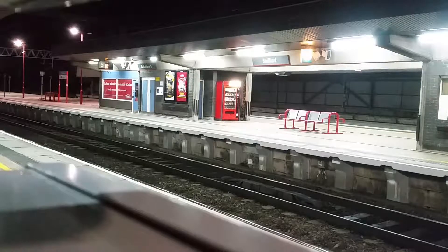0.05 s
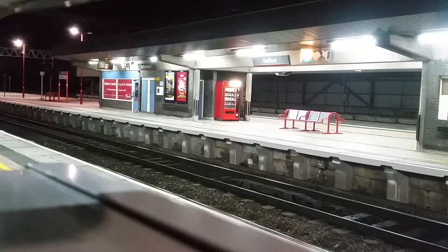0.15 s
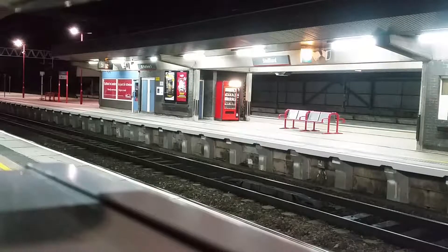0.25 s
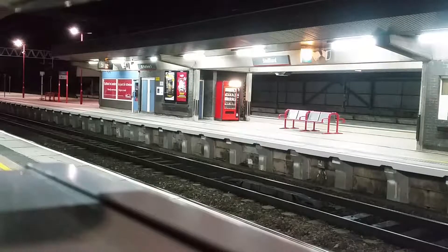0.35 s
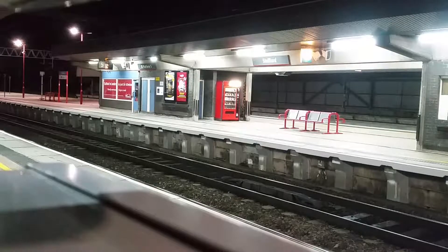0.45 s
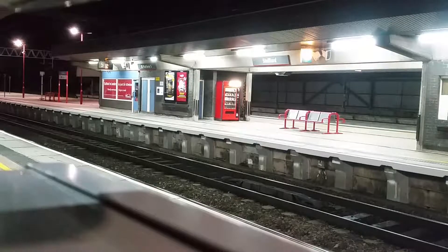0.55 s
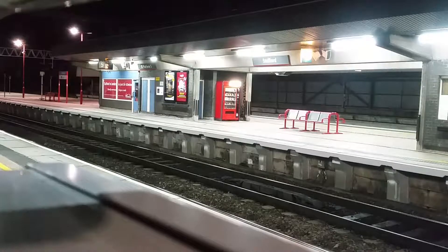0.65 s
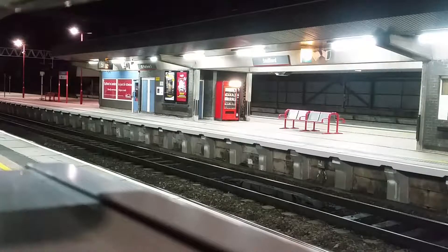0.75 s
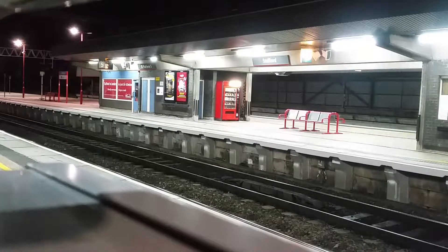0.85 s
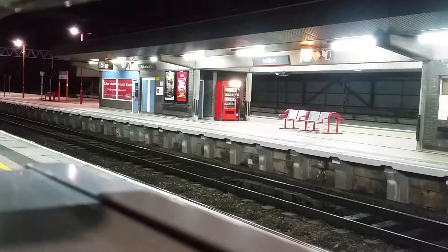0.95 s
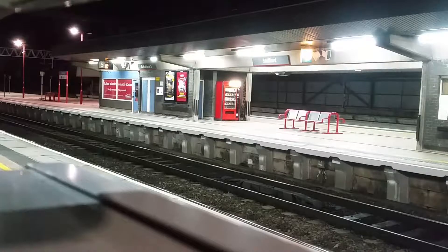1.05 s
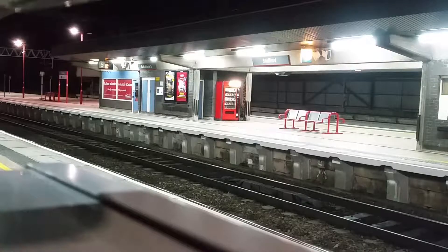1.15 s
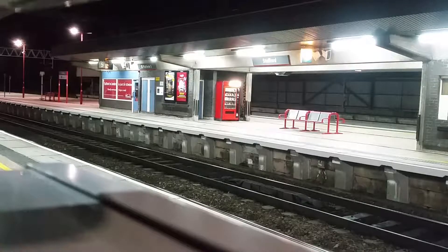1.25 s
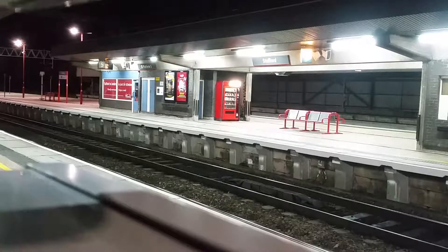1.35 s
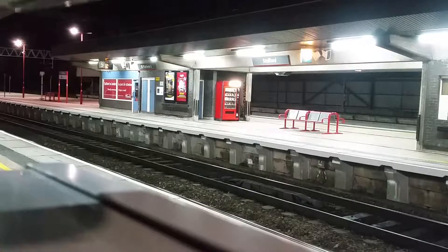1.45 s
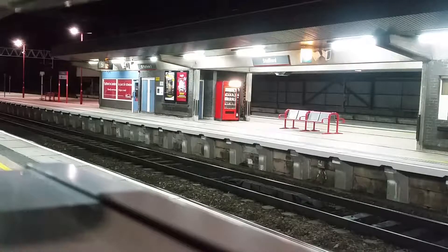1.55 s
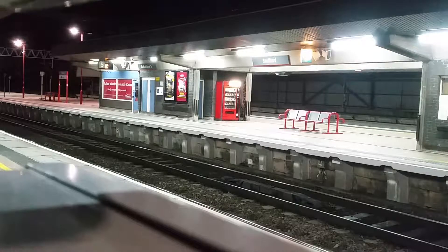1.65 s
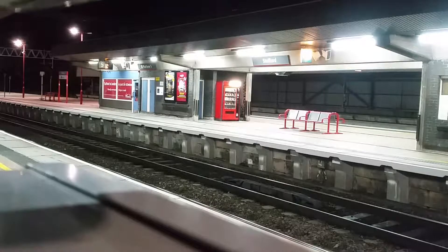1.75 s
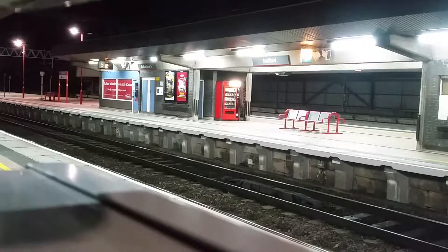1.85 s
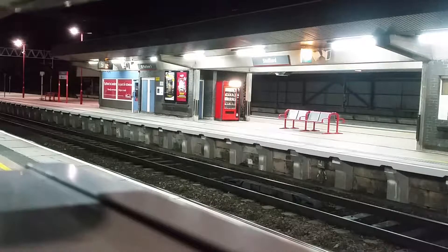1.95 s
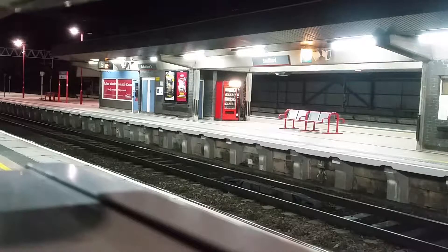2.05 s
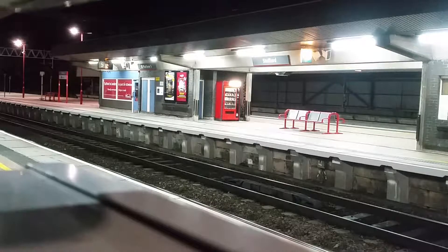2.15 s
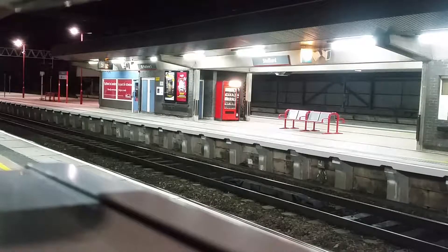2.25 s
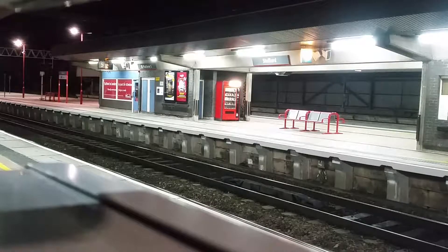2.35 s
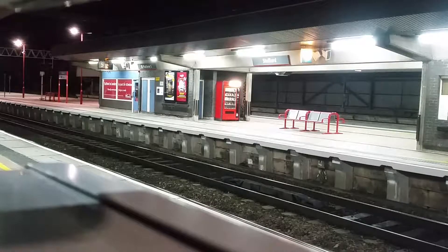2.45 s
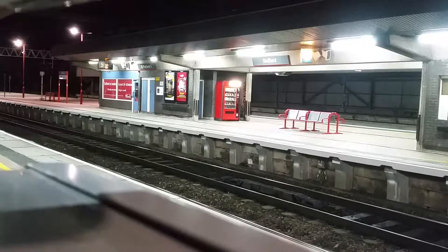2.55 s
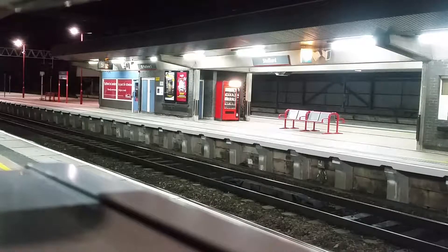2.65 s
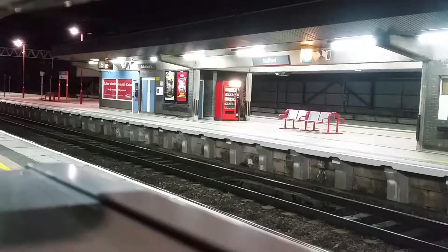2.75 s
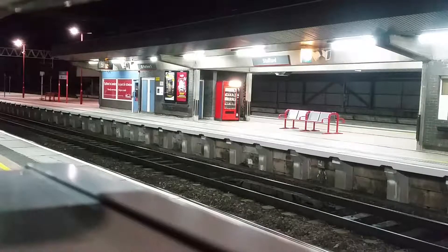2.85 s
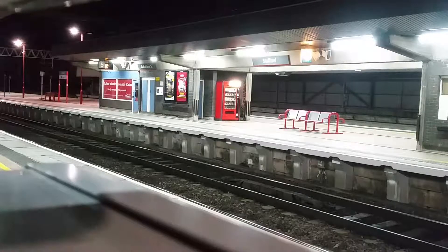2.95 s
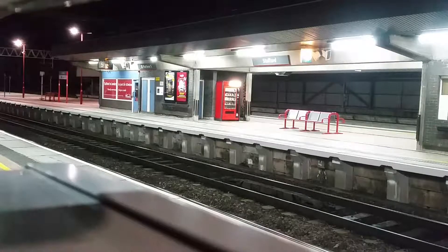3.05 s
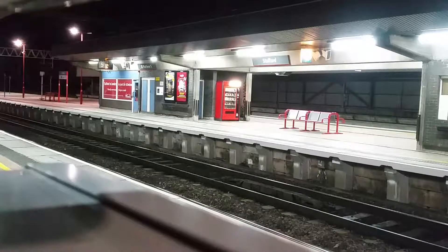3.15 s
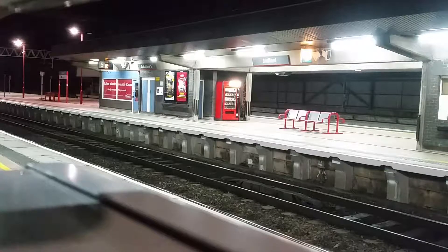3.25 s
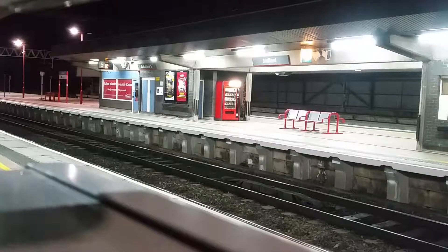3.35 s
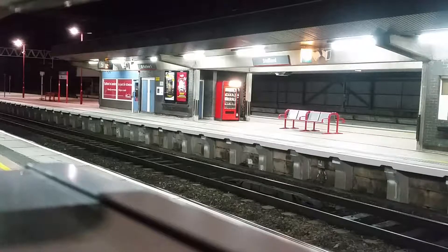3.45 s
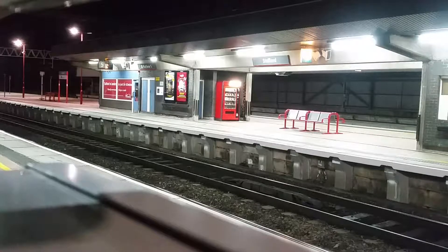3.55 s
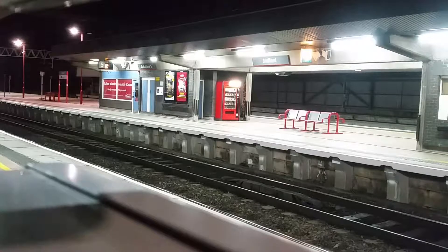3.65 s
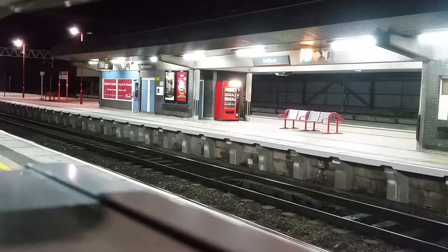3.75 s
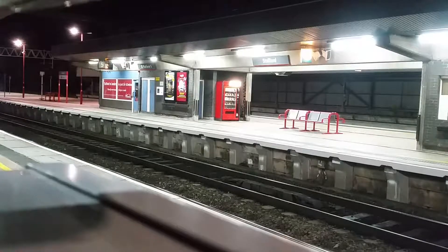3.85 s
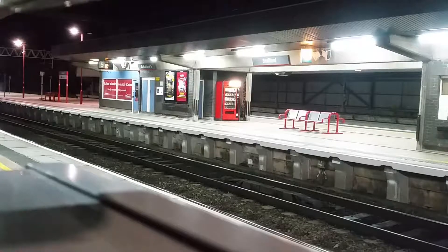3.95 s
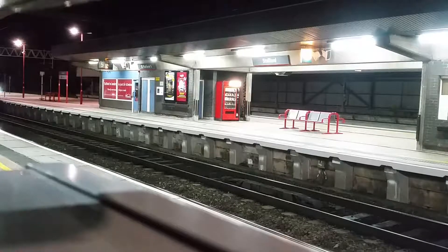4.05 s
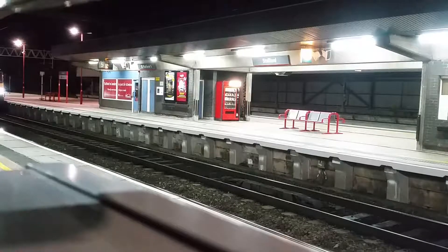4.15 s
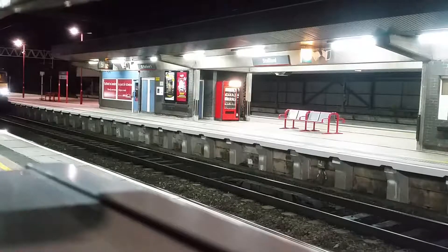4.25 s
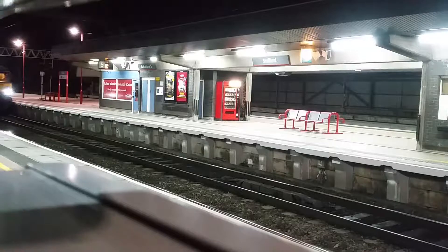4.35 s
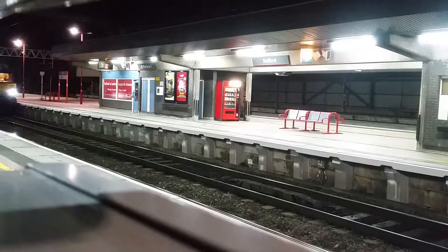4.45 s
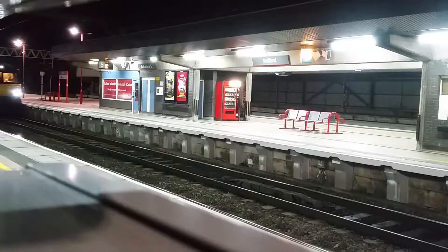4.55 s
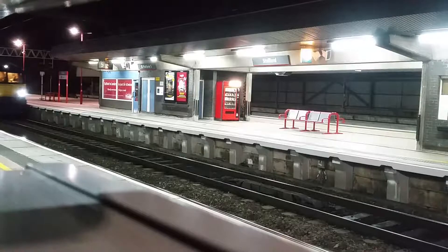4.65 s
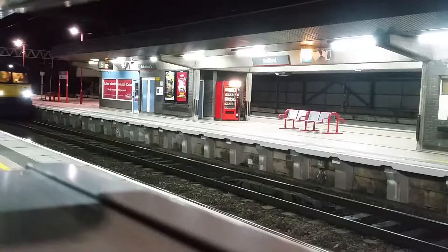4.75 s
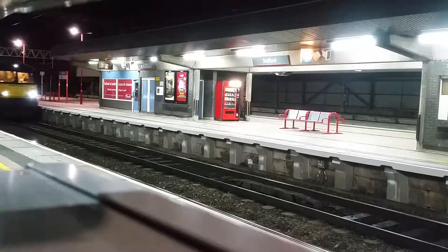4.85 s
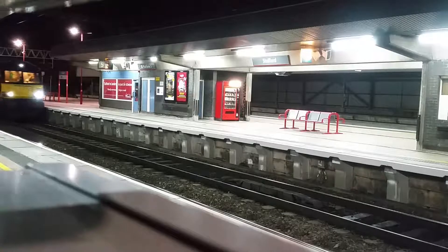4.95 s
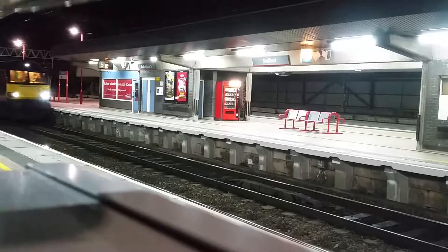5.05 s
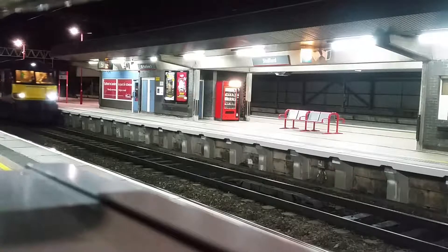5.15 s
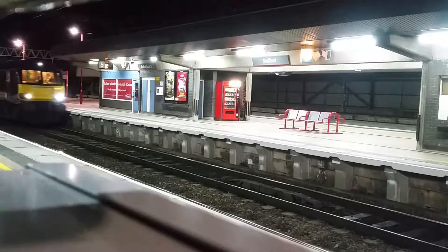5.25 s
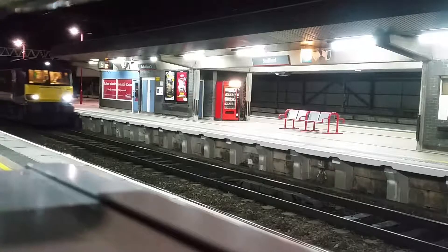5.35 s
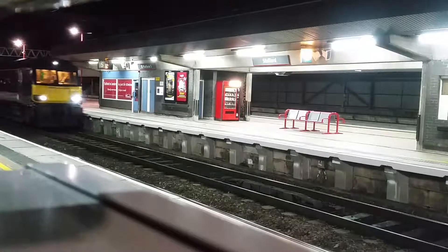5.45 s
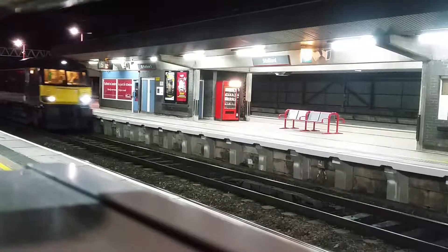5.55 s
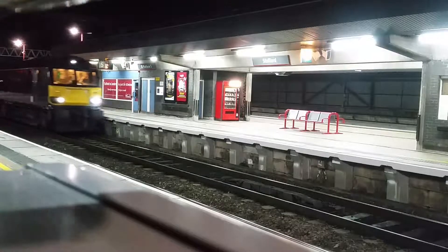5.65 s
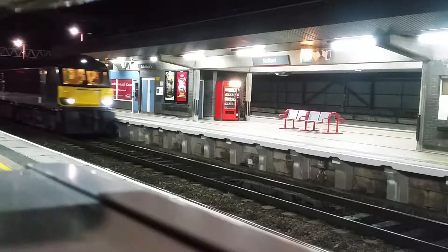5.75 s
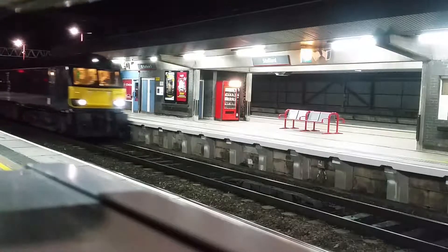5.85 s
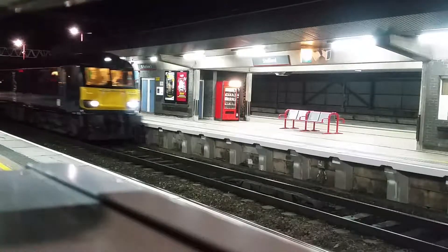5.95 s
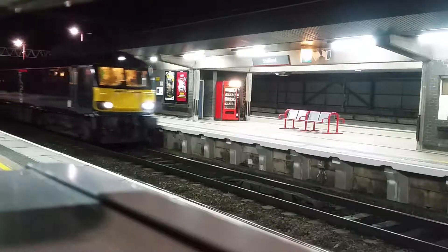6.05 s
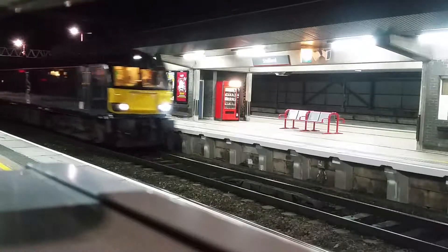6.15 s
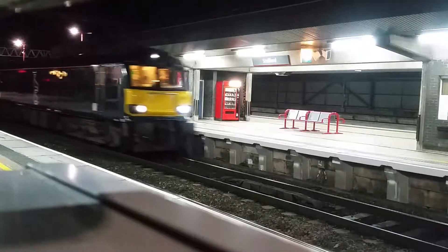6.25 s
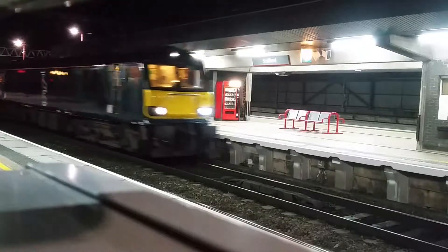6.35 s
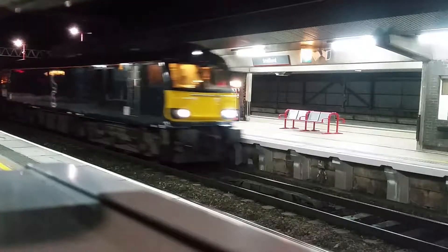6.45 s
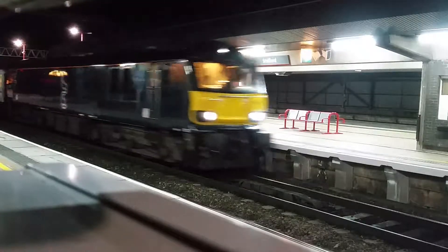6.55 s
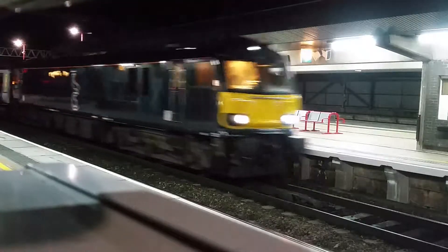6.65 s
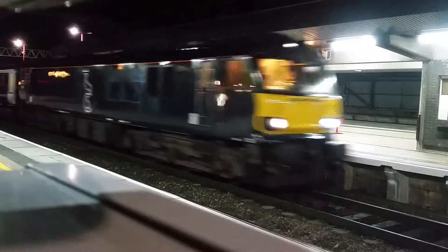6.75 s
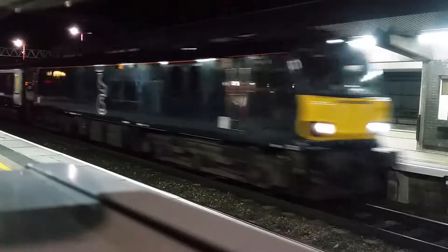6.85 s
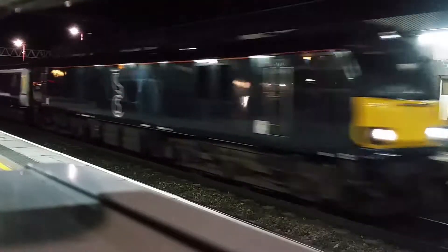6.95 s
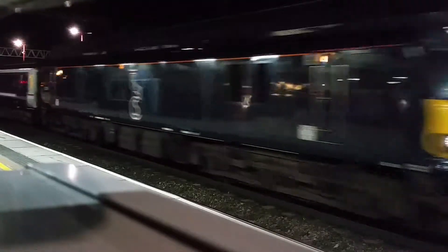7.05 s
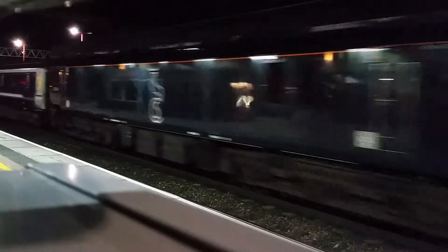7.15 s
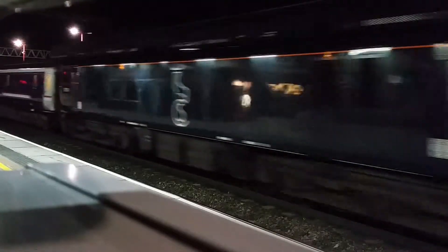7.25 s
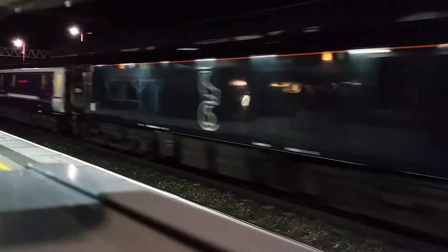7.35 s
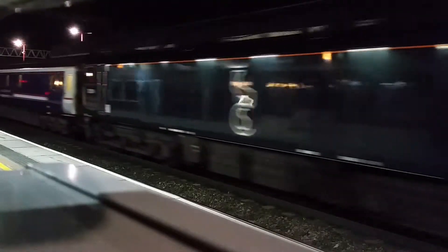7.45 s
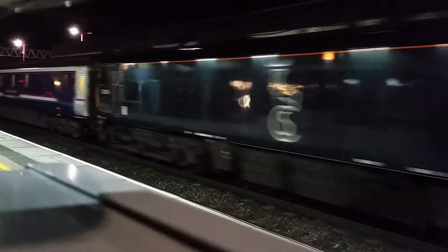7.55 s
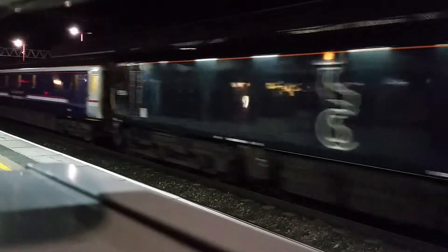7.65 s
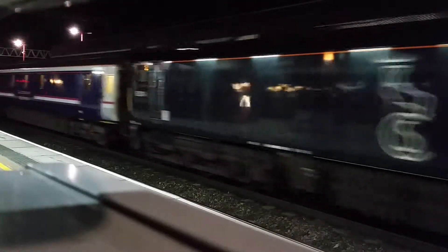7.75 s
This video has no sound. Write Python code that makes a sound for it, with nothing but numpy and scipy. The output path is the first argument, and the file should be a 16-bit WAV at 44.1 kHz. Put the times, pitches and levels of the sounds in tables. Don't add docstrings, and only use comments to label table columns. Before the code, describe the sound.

A heavy electric train approaches an empty station platform, its faint singing rail rush growing into a broad, hissing roar, left to right.

```python
import sys
import numpy as np
from scipy import signal
from scipy.fft import rfft, irfft
from scipy.io import wavfile
from scipy.ndimage import uniform_filter1d

SR = 44100
rng = np.random.default_rng(int(sys.argv[2]) if len(sys.argv) > 2 else 0)


def output_pcm(signal):
    pcm = np.clip(np.atleast_2d(signal).T, -1, 1) * 32767
    wavfile.write(sys.argv[1], SR, np.round(pcm).astype(np.int16))


def how_loud(loudness_db):
    steps = np.asarray(loudness_db, float) / 20
    return 10 ** steps


N = 343980
SIZE, HOP = 4096, 1024

# (frequency [Hz], left minus right [dB], likeness far [0-1], likeness near [0-1],
# left leads far [rad], left leads near [rad])
PORT_PAIR = [(60, 0.5, 0.985, 0.985, 0, 0), (160, 1, .99, .98, 0.1, -0.05),
             (296, 1, 0.94, 0.99, -0.1, 0.25), (500, 3.5, 0.9, 0.91, 0.8, 0.2),
             (675, 8.5, 0.66, 0.74, -0.2, 0.8), (770, 10, 0.27, 0.22, 1, 1.3),
             (1000, 7, .2, 0.21, -1.2, -2.1), (1500, 3, 0.3, 0.43, -4, -2.5),
             (2100, 2, 0.21, 0.14, -1.5, -0.2), (2500, -1.5, 0.28, .15, 1.3, -4.5),
             (2980, 0, 0.34, 0.25, 4.5, 3.2), (5000, -7.5, .45, .2, 5.5, 5.5), (6700, 1, .35, .2, 8, 7),
             (8000, -5, .2, .15, 8.5, 8.5), (11500, -7.5, .1, .1, 11.5, 16), (15000, 3, .05, .05, 17, 13.5)]


def evened(x):
    return x / np.sqrt(np.mean(x ** 2) + 1e-20)


def columns(rows, at, warp=np.asarray):
    first, *rest = np.transpose(rows)
    return [np.interp(warp(at), warp(first), c) for c in rest]


def drift(shape, across, along):
    noise = rng.standard_normal(shape[::-1]).T
    return evened(uniform_filter1d(uniform_filter1d(noise, across, 0), along, 1))


def swell(t, s, db, lasting):
    return db * np.exp(-.5 * ((t - s) / lasting) ** 2)


def smooth_step(x, at, length):
    return (1 + np.tanh((x - at) / (2 * length))) / 2


def resonance(hz, centre, width):
    return 1 / (1 + (2 * (hz - centre) / width) ** 2) ** 2


def port_gains(tilt_db):
    return how_loud([[tilt_db / 2], [-tilt_db / 2]])


def roar(t, size=5):
    # (time [s], level [dB])
    roar_rows = [(0, -36.5), (.6, -35.5), (1.2, -33.5), (2, -29.5), (2.8, -28.5), (3.3, -26.5), (4, -21),
                 (4.35, -21), (5.02, -16), (5.3, -16), (5.8, -16), (6.2, -13), (6.8, -13), (7.3, -12),
                 (7.65, -12), (7.8, -12)]
    return uniform_filter1d(columns(roar_rows, t)[0], size)


def follow(t, full_db, share, step_db, step_s, length):
    alongside_db = -13
    return full_db + share * (roar(t) - alongside_db) + step_db * smooth_step(t, step_s, length)


def vent_gust(t):
    return swell(t, s=7.39, db=3, lasting=.04)


def rolling_levels(t):
    ground_db = follow(t, full_db=-37, share=.86, step_db=-.6, step_s=7, length=.2)
    ground_db += swell(t, 5.75, 4.5, .27) + swell(t, 6.65, -5.5, .2)
    station_db = -47
    ground_db = 10 * np.log10(how_loud(2 * ground_db) + how_loud(2 * station_db))
    ring_db = follow(t, full_db=-26.5, share=.84, step_db=-3.8, step_s=6.7, length=.25)
    contact_db = follow(t, full_db=-41.3, share=.89, step_db=-4, step_s=4.9, length=.35)
    contact_db += swell(t, s=7.55, db=2.3, lasting=.35) + vent_gust(t)
    return np.array([ground_db, roar(t), ring_db, contact_db])


def singing(hz, t):
    # (start frequency [Hz], end frequency [Hz], width [Hz], level over the rush [dB],
    # clearest time [s], duration [s])
    modes = [(100, 100, 12, 3, 2, 2.5), (175, 178, 14, 5, 4.2, 2.5), (247, 250, 12, 5, 1.5, 3),
             (358, 366, 16, 4, 1.8, 2.5), (372, 376, 14, 5, 6.5, 1), (490, 485, 16, 5, 5.5, 2.5),
             (627, 630, 14, 4, 1.5, 2), (698, 716, 14, 6, 2.2, 2.2), (765, 770, 34, 5, 4.2, 1.8),
             (1065, 1065, 20, 5, 2, .5), (1400, 1480, 40, 4.5, 3.2, 2), (1440, 1485, 34, 6, 6.2, 1.3),
             (1765, 1810, 26, 5, 2, 2), (2010, 2030, 26, 5, 2, .7), (2020, 2040, 50, 3, 5.8, 1.5),
             (2600, 2600, 50, 3, 6.5, 1.5), (685, 685, 16, 5, 7.4, .5), (440, 445, 20, 5, 6.7, .6),
             (540, 535, 14, 3, 4.5, 1.2), (330, 335, 14, 4, 5.3, .6)]
    # (start frequency [Hz], end frequency [Hz], width [Hz], level over the rush [dB],
    # clearest time [s], duration [s])
    bogies = [
        (480, 560, 450, 1.9, 6.96, 0.35),
        (190, 190, 81, 2.2, 7.4, 0.25),
        (380, 306, 130, 5.4, 7.6, 0.47),
        (175, 163, 45, 2, 5.5, 0.15),
    ]
    rows = [*modes, *bogies]
    wavers = drift((len(rows), len(t)), across=1, along=16)
    waver_db = 1.2
    lift = np.ones((len(hz), len(t)))
    for (hz0, hz1, width, over_db, s, lasting), waver in zip(rows, wavers):
        centre = hz0 + (hz1 - hz0) * t / t[-1]
        strength = how_loud(2 * (over_db + waver_db * waver)) * swell(t, s, 1, lasting)
        lift += strength * resonance(hz[:, None], centre, width)
    return lift


def flares(hz, t):
    # (frequency [Hz], width [Hz], level [dB], time [s],
    # duration [s])
    rises_and_lulls = [(300, 70, 3.5, 0.22, 0.42), (353, 18, 0, 1.2, .2), (719, 26, 8.5, 1.7, 0.38),
                       (842, 81, 7, 2.2, 0.32), (714, 32, 8, 3.4, 0.17), (741, 30, 10.5, 3.9, 0.18),
                       (510, 40, 7, 3.3, 0.12), (1460, 28, 3, 4.7, 0.28), (760, 90, 3, 5.07, 0.24),
                       (623, 29, -1, 9.7, .12), (890, 60, 7.5, 3.9, 0.14), (1460, 48, 0.5, 6.3, 0.22),
                       (496, 14, 7, 5.75, 0.13), (430, 200, 2.5, 6.74, 0.14), (676, 25, 10, 10, 0.053),
                       (1480, 44, 9.5, 8.9, .15), (152, 60, 4.5, 3.2, 0.49), (280, 48, 4, 6.1, 0.15),
                       (1630, 500, 3, 1.8, 1), (5060, 1600, 1.5, 3.2, .5), (750, 120, 4.5, 6.4, .12),
                       (560, 120, 2.5, 5.9, 0.16), (2700, 400, 4.5, .4, .5), (10500, 2500, 4, 7.6, .25),
                       (170, 120, 0.5, .5, .1), (190, 150, 3, 7.3, .07), (600, 360, 1.5, 6.7, .15),
                       (1600, 1200, 0.5, 5.3, .1), (280, 66, 5, 5.05, 0.18), (199, 55, 2.5, 7.1, .12),
                       (775, 200, 1, 7.15, .12), (70, 40, 4.5, 6.1, .1), (80, 50, 3, 3.1, .1),
                       (7200, 500, 3.5, 2.6, .8), (362, 16, 5, 2.4, .08), (366, 16, 5, 2.8, .12),
                       (362, 20, 4, 4.3, .15), (700, 16, 4.5, 1.17, .15), (570, 20, 5, .9, .06),
                       (70, 60, 4, 3.78, .06),
                       (246, 50, -3.5, 1.14, 0.46), (95, 42, -11, 1.73, 0.43), (95, 50, -2.5, .15, 0.14),
             (396, 120, -1, 2, 0.37), (2420, 2100, -3, 4.07, 0.76), (520, 44, -8, 4.65, 0.2),
             (194, 83, -4, 5.3, 0.93), (800, 92, -0.5, 6.6, 0.11), (100, 66, -5.5, 5.6, 0.18),
             (1500, 50, -12, 7.55, .1), (4940, 1600, -4, 1.1, 0.65), (1460, 620, -2.5, 4.9, 0.48),
             (5000, 1700, -1.5, 7, .4), (884, 46, -4, 3.95, .15), (150, 58, -3, 8.4, .15),
             (3400, 550, -3, 4.5, .8), (100, 40, -4, 5.6, .15), (280, 70, 0.5, 7.4, 0.13),
             (1500, 50, -5.5, 1.9, .35), (121, 37, -7.5, 6.27, .12), (275, 40, -4.5, 7.78, 0.063),
             (2600, 60, -3, 6, .15), (734, 24, -6.5, 3.8, .12), (2300, 300, -5, 2.1, .2),
             (580, 80, -0.5, 5.8, .12), (1480, 40, -8, 6.85, .1), (2045, 50, -3, 5.4, .15),
             (537, 120, -3, 4.7, .12), (150, 50, -4, 5.65, .12), (110, 40, -4, 3.6, .08),
             (280, 80, -1.5, 7.42, .1), (705, 24, -5, 3.3, .18), (150, 40, -4, 7.5, .08),
             (70, 60, -4, 2.4, .12), (6500, 500, -2, 1.95, .1), (180, 40, -4.5, 5.1, .08),
             (790, 50, -4, 6.1, .08)]
    return sum(swell(t, s, db, lasting) * resonance(hz[:, None], centre, width)
               for centre, width, db, s, lasting in rises_and_lulls)


def axle_throb(t):
    # (time [s], level [dB])
    throbs = [(3.08, 0.5), (3.36, -1), (3.82, 1), (4.25, 2), (4.48, -1.5), (4.86, 0.5), (5.07, -2.5),
              (5.451, 2), (5.54, 1.5), (5.6, 2.5), (5.72, -0.5), (5.96, -1.5), (6.07, -1), (6.27, 3.5),
              (6.46, -1.5), (6.55, -0.5), (6.67, 0.5), (6.85, -0.5), (7.12, -2.5), (7.46, -3.5),
              (7.55, 0.5), (7.61, -1.5), (7.69, 2), (7.74, -2)]
    return sum(swell(t, s, db, lasting=0.015) for s, db in throbs)


def rush_power(hz, t, near, patchy_db=0.38, flicker_db=0.35):
    # (frequency [Hz], density [dB per Hz])
    far_colour = [(20, -40), (42, -8), (70, -11), (130, -8), (190, -8.5), (300, -5.5), (500, -3.5),
                  (775, -5.5), (830, -10.5), (1100, -14), (1280, -22), (2050, -22), (2400, -30),
                  (3200, -33.5), (4000, -33.5), (5000, -39.5), (6100, -47.5), (8000, -74), (12000, -96)]
    # (frequency [Hz], density [dB per Hz])
    near_colour = [(20, -48), (36, -21.5), (87, -21.5), (136, -3.5), (200, -6.5), (480, -4), (560, -6.5),
                   (770, -7), (850, -11.5), (1050, -18.5), (2100, -25.5), (3000, -33), (6700, -40),
                   (10500, -58.5), (13600, -75), (22000, -120)]
    band_edges = [35, 95, 850, 2800, 6100]
    band_offsets = [
        [0.5],
        [-0.24],
        [0.52],
        [0.86],
    ]

    far_db = columns(far_colour, hz + 1, np.log)[0][:, None]
    near_db = columns(near_colour, hz + 1, np.log)[0][:, None]
    near = np.where(hz[:, None] < 230, near * abs(near), near)
    near = near + .9 * np.maximum(near * (1 - near), 0) * (hz[:, None] > 4000)
    power = how_loud(2 * ((1 - near) * far_db + near * near_db)) * singing(hz, t)

    edges = np.array(band_edges)
    held = [power[(hz >= lo) & (hz < hi)].sum(0) for lo, hi in zip(edges, edges[1:])]
    gains_db = rolling_levels(t) + band_offsets - 10 * np.log10(held)
    bands = np.arange(len(held))
    centres = np.sqrt(edges[1:] * edges[:-1])
    place = np.interp(np.log(hz + 1), np.log(centres), bands)
    weights = np.maximum(1 - abs(place[:, None] - bands), 0)

    rough_db = patchy_db * drift(power.shape, across=30, along=4)
    beat_db = axle_throb(t) + flicker_db * drift((1, len(t)), across=1, along=1)
    rough_db += beat_db * np.minimum(hz / 3000, 1)[:, None]
    return power * how_loud(2 * (weights @ gains_db + rough_db + flares(hz, t)))


def air_levels(t):
    cavity_db = follow(t, full_db=-47.5, share=.98, step_db=-15, step_s=5.75, length=.6)
    shelf_db = follow(t, full_db=-64.8, share=.56, step_db=5, step_s=7.15, length=.07)
    shelf_db += swell(t, s=6.7, db=-4.5, lasting=.3)
    top_db = follow(t, full_db=-106, share=.2, step_db=37, step_s=7.05, length=.07)
    top_db += swell(t, s=2.2, db=19, lasting=.4)
    return np.array([cavity_db, shelf_db, top_db]) + vent_gust(t)


def air_power(hz, t, gust_db=1.5):
    # (frequency [Hz], density [dB per Hz])
    air_colour = [(9500, -41), (9900, -15.5), (11200, -12), (11500, 0), (13000, 1), (14200, -2),
                  (14500, -24), (15500, -34), (16000, -44.5)]
    cavity_width = np.interp(t, [0, 4], [260, 700])
    cavity = resonance(hz[:, None], 6640, cavity_width)
    shelf = how_loud(2 * columns(air_colour, hz + 1, np.log)[0])
    top = 1. * (hz > 14400) * (hz < 15800)
    shapes = [shape / shape.sum(0) for shape in (cavity, shelf[:, None], top[:, None])]
    levels_db = air_levels(t) + gust_db * drift((1, len(t)), across=1, along=2)
    return sum(shape * how_loud(2 * db) for shape, db in zip(shapes, levels_db))


def veil(hz, t):
    # (low edge [Hz], high edge [Hz], level [dB], clearing time [s], clearing length [s])
    veils = [
        (7700, 8350, -20, 3.8, .2),
        (8350, 9600, -16, 3.0, .25),
    ]
    out_db = 0
    for lo_hz, hi_hz, depth_db, s, length in veils:
        veiled = smooth_step(hz, lo_hz, 30) * (1 - smooth_step(hz, hi_hz, 30))
        out_db = out_db + veiled[:, None] * depth_db * (1 - smooth_step(t, s, length))
    return how_loud(2 * out_db)


def train():
    # (time [s], nearness [0 far, 1 alongside, below 0 still duller], extra delay at the left port [samples])
    approach = [
        (0, -.3, 0),
        (1.2, -.15, 0),
        (2, 0, 0),
        (3, .15, 0),
        (4, .4, .5),
        (5, .6, 1.5),
        (6, .75, 5),
        (7, .98, 15),
        (7.8, .99, 24),
    ]
    hz, t = np.fft.rfftfreq(SIZE, 1 / SR), np.arange(N // HOP + 6) * HOP / SR
    near, delay = columns(approach, t)
    power = (rush_power(hz, t, near) + air_power(hz, t)) * veil(hz, t)
    near = np.clip(near, 0, 1)
    pair = columns(PORT_PAIR, hz + 1, np.log)
    tilt_db, same_far, same_near, lead_far, lead_near = (c[:, None] for c in pair)
    same = np.clip((1 - near) * same_far + near * same_near, 0, 1)
    swing = 2 * np.pi * np.maximum(hz - 2000, 0)[:, None] * delay / SR
    lead = (1 - near) * lead_far + near * lead_near - swing
    left_gain, right_gain = how_loud(tilt_db / 2), how_loud(-tilt_db / 2)
    mid_power = (left_gain ** 2 + right_gain ** 2 + 2 * same * np.cos(lead)) / 4
    a, b, c, d = rng.standard_normal((len(t), len(hz), 4)).T
    left = a + 1j * b
    right = same * left * np.exp(-1j * lead) + np.sqrt(1 - same ** 2) * (c + 1j * d)
    z = np.array([left_gain * left, right_gain * right]) * np.sqrt(3 / 2 * power / mid_power)
    return signal.istft(z, nperseg=SIZE, noverlap=SIZE - HOP)[1][:, :N]


def motors(wander_hz=2.143):
    # (start frequency [Hz], end frequency [Hz], level against roar [dB],
    # clearest time [s], duration [s])
    tones = [(100.5, 100, -19, 1.2, 1.6), (357, 374, -12, .8, 2.6), (491, 484, -14, 2.9, 2),
             (696, 724, -16, 2.3, 1.5), (764, 764, -16, .5, .7), (974, 974, -25, 3.2, .3),
             (178, 178, -15, 5.9, .5), (1780, 1800, -31, 3.2, .7), (1400, 1500, -34, 4.6, .8),
             (248, 250, -19.5, 1.2, 1.5), (760, 772, -17, 4.9, .4), (641, 635, -18, 6.8, .3),
             (371, 371, -15, 6.5, .4), (447, 447, -14.5, 6.55, .2), (178, 178, -14, 6.15, .12),
             (366, 366, -17, 4.3, .5), (1820, 1820, -35, 4.7, .5), (250, 250, -19, 4.9, .5),
             (737, 737, -18, 6.7, .25), (490, 490, -14, 5.75, .15), (688, 688, -15, 7.27, .08),
             (1400, 1470, -31, 4.55, .2), (1420, 1472, -26, 5.95, .22), (1900, 1465, -26, 7.1, .06),
             (1465, 1465, -25, 7.8, .07), (786, 786, -19, 5.2, .12), (1066, 1066, -27, 5.15, .1),
             (1125, 1125, -28, 7.2, .1), (1630, 1630, -30, .2, .12), (1631, 1631, -31, 3.4, .12),
             (1490, 1490, -28, 6.6, .05), (590, 590, -17, 6.7, .08), (495, 495, -17, 7.7, .1)]
    t, slow = np.arange(N) / SR, np.arange(N // HOP + 2) * HOP / SR
    roar_db = uniform_filter1d(roar(slow), size=15)
    wavers, wanders = drift((2 * len(tones), len(slow)), across=1, along=7).reshape(2, len(tones), -1)
    out, waver_db = np.zeros((2, N)), 1.6
    for (hz0, hz1, under_db, s, lasting), waver, wander in zip(tones, wavers, wanders):
        hz = hz0 + (hz1 - hz0) * slow / slow[-1] + wander_hz * wander
        level = how_loud(roar_db + under_db + waver_db * waver)
        level = level * np.exp(-((slow - s) / (2 * lasting)) ** 2)
        heard = slice(max(round((s - 6 * lasting) * SR), 0), round((s + 6 * lasting) * SR))
        phase = 2 * np.pi * np.cumsum(np.interp(t[heard], slow, hz)) / SR
        tone = np.sqrt(2) * np.interp(t[heard], slow, level) * np.sin(phase)
        out[:, heard] += port_gains(columns(PORT_PAIR, hz0, np.log)[0]) * tone
    return out


def flecked(x):
    # (low edge [Hz], high edge [Hz], depth [dB], end time [s])
    flecks = [
        (7600, 11300, 2.8, 6.8),
        (13400, 16000, 3, 6.95),
        (11300, 13400, 1.2, 6.9),
    ]
    hz, t, z = signal.stft(x, SR, nperseg=1024)
    depth_db = sum(db * np.outer((hz >= lo) & (hz < hi), t < until) for lo, hi, db, until in flecks)
    patches = drift(depth_db.shape, across=9, along=3)
    gain = how_loud(depth_db * patches - depth_db ** 2 * np.log(10) / 20)
    return signal.istft(z * gain, SR, nperseg=1024)[1][:, :N]


def catch(tail_db=-26, tail_t60=0.4):
    # (time [s], peak level [dB], burst length [ms], share of body ring [0-1])
    clicks = [(1.2990, -40, 2, .15), (1.3066, -39, 2, .15), (1.3190, -41, 2, .1), (1.3384, -46, 2.4, .1),
              (1.3795, -32.5, 2.2, .05), (1.3864, -44, 1.6, .1), (1.431, -40.5, 1.5, .01),
              (1.4338, -24, 1.6, 0.26), (1.4400, -42, 1.5, .1), (1.4436, -30.5, 1.3, .4),
              (1.4490, -41.5, 2, .35), (1.4640, -45.5, 3, .15), (1.4900, -48, 4, .15)]
    # (frequency [Hz], level [dB])
    snap_colour = [(700, -30), (1800, -6), (2800, -6.5), (3600, 1), (4600, 2), (5800, -2), (7300, -0.5),
                   (8600, -12), (10500, -15.5), (13400, -10), (14600, -22), (16000, -30)]
    ring_hz, ring_t60, pan_db = 3480, .018, -8
    out, t = np.zeros((2, N)), np.arange(16384) / SR
    body = how_loud(-60 * t / ring_t60) * np.sin(2 * np.pi * ring_hz * t)
    colour = how_loud(columns(snap_colour, np.fft.rfftfreq(len(t), 1 / SR) + 1, np.log)[0])
    scrapes = rng.standard_normal((len(clicks), 2, len(t)))
    for (s, peak_db, ms, share), scrape in zip(clicks, scrapes):
        u = t / (ms / 1000)
        tail = how_loud(tail_db - 60 * t / tail_t60) * np.minimum(u, 1)
        shape = np.e * 2 * u * np.exp(-2 * u) + tail
        burst = rfft((scrape[0] + 0.66 * scrape) * shape)
        flat = burst / np.sqrt(uniform_filter1d(abs(burst) ** 2, size=280))
        snap = irfft(flat * colour)
        rung = signal.fftconvolve(snap, body[None], axes=1)[:, :len(t)]
        fade = np.cos(np.pi / 2 * t / t[-1]) ** 2
        sound = ((1 - share) * evened(snap) + share * evened(rung)) * fade
        at = round(s * SR)
        out[:, at:at + len(t)] += how_loud(peak_db + 1.5) * port_gains(pan_db) * sound / abs(sound).max()
    return out


def scene():
    return flecked(train() + motors()) + catch()


def top_cut(x):
    return signal.sosfilt(signal.butter(12, 15730, fs=SR, output="sos"), x)


def record(dry):
    dry = signal.sosfilt(signal.butter(6, 41, "high", fs=SR, output="sos"), dry)
    treble_limit = signal.firwin(511, 15850, window=("kaiser", 9), fs=SR)
    dry = signal.oaconvolve(dry, treble_limit[None], "same")
    ceiling = 1.15
    return top_cut(ceiling * np.tanh(dry / ceiling))


dry = scene()
out = record(dry)
output_pcm(out)
```